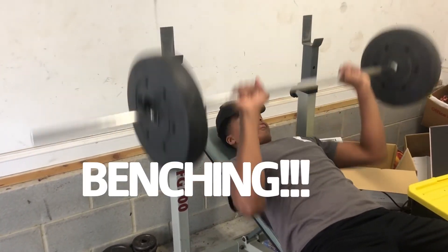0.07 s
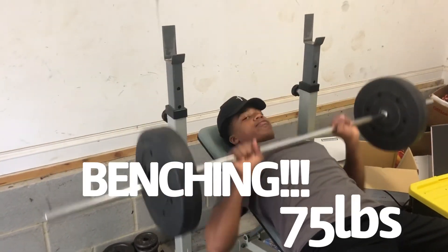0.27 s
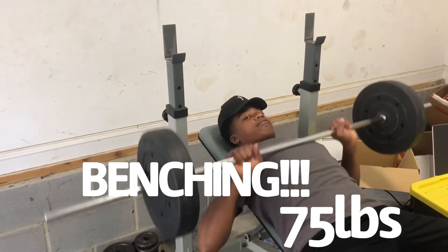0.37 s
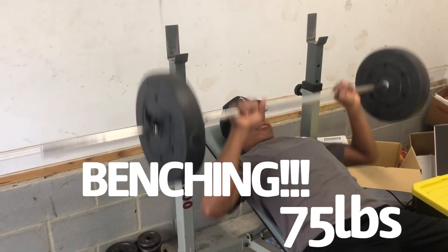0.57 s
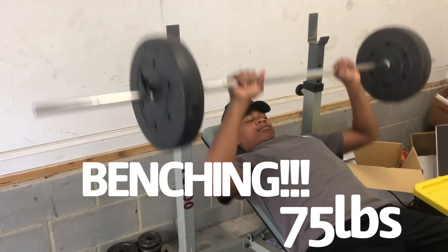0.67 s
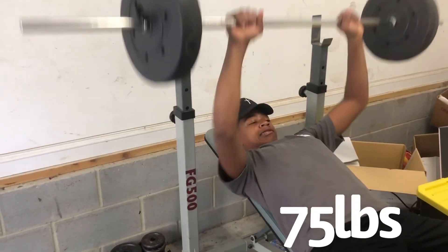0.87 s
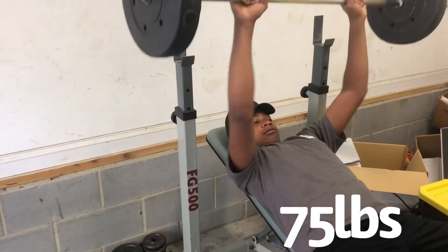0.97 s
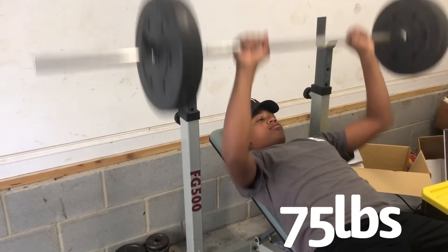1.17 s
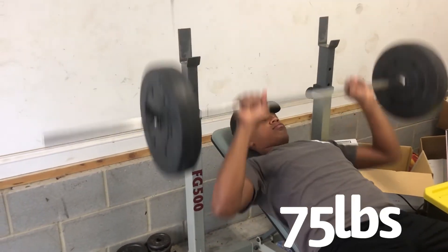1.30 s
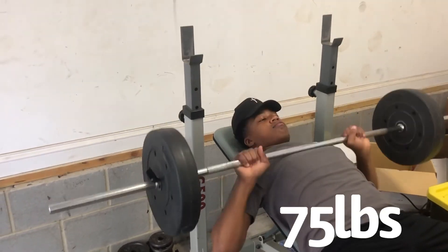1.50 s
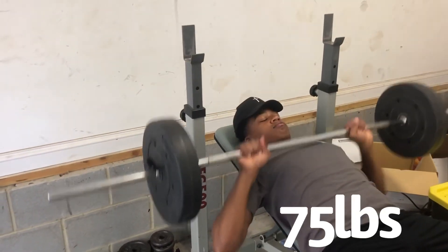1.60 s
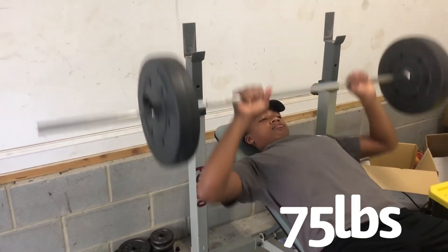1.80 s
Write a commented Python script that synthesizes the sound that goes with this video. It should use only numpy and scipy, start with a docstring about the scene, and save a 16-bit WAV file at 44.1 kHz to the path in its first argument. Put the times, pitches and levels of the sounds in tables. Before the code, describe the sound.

Loose weight plates chatter and clank on a barbell during bench presses, echoing briefly.

```python
"""A loaded barbell is bench-pressed in a bare-walled room, a couple of metres away.
First, at the bottom of the press, the loose plates chatter on the bar. On the way up, one snaps
against its neighbour. At the top the plates clunk over and set the steel bar ringing, and then they
shift with a few light clacks. The room echoes each knock; soft thuds and a faint hiss lie underneath."""
import sys
import numpy as np
from scipy import signal
from scipy.fft import rfft, irfft
from scipy.io import wavfile

SR = 44100
rng = np.random.default_rng(int(sys.argv[2]) if len(sys.argv) > 2 else 0)


def waveform_to_disk(signal):
    """Save audio, clipped to [-1, 1], as 16-bit WAV at the path in sys.argv[1]."""
    frames = np.transpose(np.atleast_2d(signal))
    scaled = np.clip(frames, -1, 1) * 32767
    samples = np.round(scaled).astype(np.int16)
    wavfile.write(sys.argv[1], SR, samples)


N = 81585

# the hollow tone of a clunk (frequency [Hz], level [dB])
CLUNK_TONE = [(60, -49), (100, -39), (250, -18), (410, -13), (730, 1), (1000, -1), (1350, -3.5), (1650, -8),
              (1900, -12.5), (2600, -18.5), (3400, -26), (5100, -31), (7000, -32.5), (9600, -27.5),
              (12000, -38.5), (15500, -49)]


def clunks():
    """The plates tip over at the top of the press and strike the bar, which rings low and high."""
    # (time [s], level [dB], decay [s], tilt [dB/octave], extra ring [dB], strongest ring [Hz])
    hits = [(0.9177, -40, 0.0025, -9.5, -2, 2500), (0.932, -31, .012, 3, 11.5, 6100),
            (0.9455, -20, 0.011, 0.5, -1, 4330), (0.956, -25, 0.024, 2, 3.5, 6900),
            (0.974, -24, 0.0095, 2, 3, 6140), (1.007, -39.5, 0.011, 3.5, 17, 3520),
            (1.054, -26, 0.0098, 2.5, -18, 2980), (1.065, -20, 0.0089, 0, -2, 2700),
            (1.077, -22, 0.0044, -3, 0, 2600), (1.087, -25, 0.0053, 1.5, 3.5, 2880),
            (1.106, -30.5, 0.019, 0.5, -2, 3800), (1.138, -37.5, .015, 1.5, 5.5, 4200),
            (1.212, -41, 0.0054, 2.5, -4, 2600)]
    # low notes of the bar's body (frequency [Hz], level [dB])
    body_notes = [(522.2, -54), (726.7, -51), (850.6, -48), (958.2, -51), (1007, -53), (1071, -52),
                  (1130, -50), (1319, -49), (1459, -58), (1631, -55)]
    # high notes of its steel (frequency [Hz], level [dB])
    steel_notes = [(2245, -58), (2622, -60), (3031, -63), (3418, -57), (3828, -64), (4253, -61),
                   (4764, -73), (5776, -68), (6293, -64), (6821, -69), (7413, -69), (8070, -77)]
    blows = [(*hit[:4], 0) for hit in hits]  # the body follows only the force of each hit
    return (knocks(hits, CLUNK_TONE, rise_s=0.0013)
            + ringing(blows, body_notes, ring_db=-2.5, fade_s=0.22, tilt_db=2)
            + ringing(hits, steel_notes, ring_db=-9.5, fade_s=0.15, tilt_db=4, focus_db=9))


def chatter():
    """Loose plates rattle on the bar at the bottom of the press, getting duller as they settle."""
    # bounces of the plates (time [s], level [dB])
    bounces = [(0.1993, -16), (0.2033, -14), (0.2089, -16), (0.217, -15.5), (0.223, -13), (0.228, -16),
               (0.236, -19), (0.243, -17.5), (0.2495, -13.5), (0.256, -18), (0.265, -22), (0.273, -19),
               (0.288, -28.5), (0.325, -33)]
    # tone of a bounce (frequency [Hz], level [dB])
    tone = [(59, -75), (100, -41.5), (250, -18.5), (362, -12.5), (560, -16), (700, -6.5), (1000, -9),
            (1590, -14.5), (1800, -5.5), (2050, -11), (2350, -9.5), (3250, -4), (3700, -8.5), (5000, -2),
            (5500, -5.5), (6800, 1), (7400, -6), (8000, 0.5), (8800, 1), (10400, -3), (11500, -17.5),
            (13500, -16.5), (15500, -22.5)]
    # short, bright notes of the plates (frequency [Hz], level [dB])
    plate_notes = [(4630, -49), (4899, -48), (5141, -47), (5992, -46), (6110, -48), (6293, -47),
                   (6735, -47), (6896, -41), (7800, -44), (8064, -49), (8253, -48), (8414, -46),
                   (8909, -41), (9135, -49), (9259, -50), (9900, -47), (10180, -50), (10244, -46)]
    # their long, faint after-ring (frequency [Hz], level [dB])
    long_notes = [(680, -2), (1305, -2), (1825, -1), (3150, -4), (3240, -1), (3920, -5), (4220, -5),
                  (5722, -5), (6620, -3), (6898, 0)]
    decay_s, dulling = 0.0085, 11.5  # dulling: dB per octave lost each second
    first_s = bounces[0][0]
    hits = [(start, db, decay_s, -dulling * (start - first_s), 0) for start, db in bounces]
    return (knocks(hits, tone)
            + ringing(hits, plate_notes, ring_db=-7, fade_s=0.098, tilt_db=-1.5)
            + ringing(hits, long_notes, ring_db=-21.5, fade_s=0.63, tilt_db=3.5))


def snaps():
    """One plate snaps against its neighbour on the way up and rings."""
    # (time [s], level [dB], decay [s], tilt [dB/octave], extra ring [dB])
    hits = [(0.7042, -19.5, 0.0016, -1.5, 0), (0.708, -26, 0.00078, 0, -7)]
    # tone of a snap (frequency [Hz], level [dB])
    tone = [(100, -47), (370, -15), (520, -14), (810, -5), (1200, -9.5), (1700, -3.5), (2400, 0.5),
            (3400, -9), (4750, -8.5), (5500, -15.5), (6500, -8), (7100, -4), (9540, -2), (10500, -12),
            (11500, -15), (15500, -38)]
    # notes of that plate (frequency [Hz], level [dB])
    notes = [(2379, -57), (2821, -61), (3381, -62), (4247, -65), (7111, -62), (7580, -61), (8226, -63),
             (8484, -65), (9582, -61)]
    return knocks(hits, tone, rise_s=0.00028) + ringing(hits, notes, ring_db=-12, fade_s=0.31)


def clacks():
    """Shifting plates tick lightly and ring the sleeve, the end of the bar that holds them."""
    # (time [s], level [dB], decay [s], tilt [dB/octave], extra ring [dB])
    hits = [(0.02, -47.5, 0.0019, -5.5, -12), (0.13, -55.5, 0.0025, 8, -16),
            (0.586, -41, 0.012, -0.5, -14.5), (0.663, -40, .002, 9, -11), (1.450, -48, .004, 4, -16),
            (1.466, -39, 0.021, -7, -12), (1.4755, -27.5, 0.0072, 4.5, -4), (1.479, -22.5, 0.0015, 2, 1),
            (1.488, -39.5, .015, -4, -11), (1.515, -34.5, 0.0046, -3.5, 10.5), (1.519, -28, 0.003, -2.5, 3),
            (1.539, -36, 0.014, -5, -15)]
    # tone of a clack (frequency [Hz], level [dB])
    tone = [(60, -38), (100, -46.5), (264, -11), (500, -10.5), (900, -3.5), (1880, -6.5), (2400, -6),
            (4280, -8.5), (4700, -6), (5500, -7.5), (8300, -5), (9400, 0), (10800, -7), (11800, -15),
            (15500, -25.5)]
    # notes of the sleeve (frequency [Hz], level [dB])
    notes = [(4818, -57), (5233, -58), (6158, -60), (7133, -61), (8947, -56), (9480, -54), (10643, -60)]
    return knocks(hits, tone, rise_s=0.00093) + ringing(hits, notes, ring_db=0, fade_s=0.022, tilt_db=-6)


def knocks(hits, tone, rise_s=0.0001):
    """Each knock is a burst of tiny uneven collisions, made here from fast-dying noise."""
    out, t = np.zeros(N), np.arange(SR // 3) / SR
    for start, db, decay_s, tilt_db, *_ in hits:
        burst = rng.standard_normal(len(t)) * np.exp(-t / decay_s) * (1 - np.exp(-t / rise_s))
        burst *= np.sqrt(0.01 * SR / np.sum(burst ** 2))  # long and short bursts get equal energy
        add(out, start, undb(db) * colour(burst, tone, tilt_db))
    return out


def ringing(hits, notes, ring_db, fade_s, tilt_db=0, focus_db=0):
    """Struck metal rings at its own notes, in a slightly different balance on every hit."""
    out, t = np.zeros(N), np.arange(SR) / SR
    split_hz, rise_s, scatter_db = 9.1, 0.0015, 2.0
    # each note is a close pair of pitches, which makes it waver
    hz, db = np.repeat(np.array(notes, float), 2, axis=0).T
    hz = hz + split_hz * np.tile([-1, 1], len(notes)) * rng.uniform(0, 2.06, len(hz))
    # a middle note falls 60 dB in fade_s; higher notes die sooner
    decay = np.log(1000) / fade_s * (hz / np.median(hz)) ** 0.38
    waves = np.exp((2j * np.pi * hz - decay)[:, None] * t) * (1 - np.exp(-t / rise_s))
    for start, hit_db, _, _, extra_db, *strongest_hz in hits:
        octaves_away = abs(np.log2(hz / strongest_hz[0])) if strongest_hz else 0
        note_db = db + tilt_db * np.log2(hz) - focus_db * octaves_away
        gain = undb(note_db + scatter_db * rng.standard_normal(len(hz)))
        phases = np.exp(2j * np.pi * rng.random(len(hz)))
        weights = gain / np.linalg.norm(gain) * phases
        add(out, start, undb(hit_db + extra_db + ring_db) * (weights @ waves).imag)
    return out


def room_echo(sound):
    """Bare walls send back dense echoes that build up quickly and die soonest in the treble."""
    # how long the room rings (frequency [Hz], time to fall 60 dB [s])
    fade_times = [(200, 0.63), (800, 0.61), (2000, 0.59), (4500, 0.49), (8000, 0.36), (14000, 0.26)]
    first_echo_s, build_s = 0.0013, 0.0027
    t, hz = np.arange(SR) / SR, np.arange(SR // 2 + 1)
    spectrum, echoes = rfft(rng.standard_normal(SR)), 0
    for band_hz, fade_s in fade_times:
        band = read_curve(hz, [(f, f == band_hz) for f, _ in fade_times])
        echoes = echoes + irfft(spectrum * band, SR) * np.exp(-np.log(1000) * t / fade_s)
    echoes *= 1 - np.exp(-np.maximum(t - first_echo_s, 0) / build_s)
    return signal.fftconvolve(sound, echoes / np.linalg.norm(echoes))[:N]


def thuds():
    """The load thuds softly through the bench as it changes direction."""
    # (time [s], level [dB])
    hits = [(0.255, -73), (1.06, -62), (1.438, -66)]
    # deep tone of a thud (frequency [Hz], level [dB])
    tone = [(25, -18.5), (60, -9), (105, -5), (200, -30), (800, -50)]
    out, t = np.zeros(N), np.arange(SR // 4) / SR
    peak_s = 0.029
    swell = t / peak_s * np.exp(1 - t / peak_s)
    for start, db in hits:
        add(out, start, undb(db) * swell * colour(rng.standard_normal(len(t)), tone))
    return out


def background():
    """Steady room noise, a soft high hiss and the dying echo of an earlier clunk."""
    # tone of the room noise (frequency [Hz], level [dB])
    room_tone = [(25, -14), (55, 5.5), (85, -3), (120, 3), (250, -4), (700, -1), (1300, -12.5),
                 (2500, -14.5), (6000, -16.5), (10000, -25), (12500, -34), (15500, -41)]
    # tone of the hiss (frequency [Hz], level [dB])
    hiss_tone = [(3000, -25), (7500, -8), (10000, 0.5), (11000, -7), (12500, -17), (15500, -19)]
    # how the hiss falls and rises (time [s], level [dB])
    hiss_levels = [(0, -60.5), (.15, -67.5), (.55, -76), (.65, -74), (.9, -67), (1.2, -65), (1.42, -67),
                   (1.8, -73.5)]
    t = np.arange(N) / SR
    room, hiss, tail = rng.standard_normal((3, N))
    hiss_db = np.interp(t, *np.array(hiss_levels).T)
    tail_fade = np.exp(-np.log(1000) * t / 0.78)  # falls 60 dB in 0.78 s
    return (undb(-63) * colour(room, room_tone)
            + undb(hiss_db) * colour(hiss, hiss_tone)
            + undb(-57.5) * tail_fade * colour(tail, CLUNK_TONE))


def colour(sound, tone, tilt_db=0):
    """Give a sound a tone; a positive tilt (dB per octave above 500 Hz) makes it brighter."""
    size = 4096
    hz = np.maximum(np.arange(size // 2 + 1) * SR / size, 20)
    gain = undb(read_curve(hz, tone) + tilt_db * np.log2(np.maximum(hz, 500)))
    gain /= np.sqrt(np.mean(gain ** 2))
    # fold the filter so that nothing sounds before the hit
    folded = irfft(np.log(gain))
    folded[1:size // 2] *= 2
    folded[size // 2 + 1:] = 0
    response = irfft(np.exp(rfft(folded)))
    return signal.fftconvolve(sound, response)[:len(sound)]


def read_curve(hz, points):
    """Read between (frequency [Hz], value) points, with octaves evenly spaced."""
    point_hz, values = np.array(points, float).T
    return np.interp(np.log(np.maximum(hz, 1)), np.log(point_hz), values)


def undb(db):
    """Turn decibels into a number to multiply by."""
    return 10 ** (np.asarray(db) / 20)


def add(out, start_s, sound):
    """Mix a sound in from a given time."""
    i = int(start_s * SR)
    out[i:i + len(sound)] += sound[:N - i]


def scene():
    """The barbell and its echo over the thuds and background, in mono."""
    # (sound, level of its echo [dB])
    parts = [(chatter(), -4.5), (snaps(), -4), (clunks(), -4), (clacks(), -2.5)]
    direct = sum(sound for sound, _ in parts)
    echo = room_echo(sum(sound * undb(db) for sound, db in parts))
    distance_db = -9.5
    return (undb(distance_db) * (direct + echo) + thuds() + background())[None]


def record(dry):
    """Cut the deepest bass and the highest treble."""
    bass_cut = signal.butter(4, 34, "high", fs=SR, output="sos")
    treble_cut = signal.ellip(10, .2, 80, 15800, fs=SR, output="sos")
    return signal.sosfilt(treble_cut, signal.sosfilt(bass_cut, dry))


dry = scene()
out = record(dry)
waveform_to_disk(out)
```